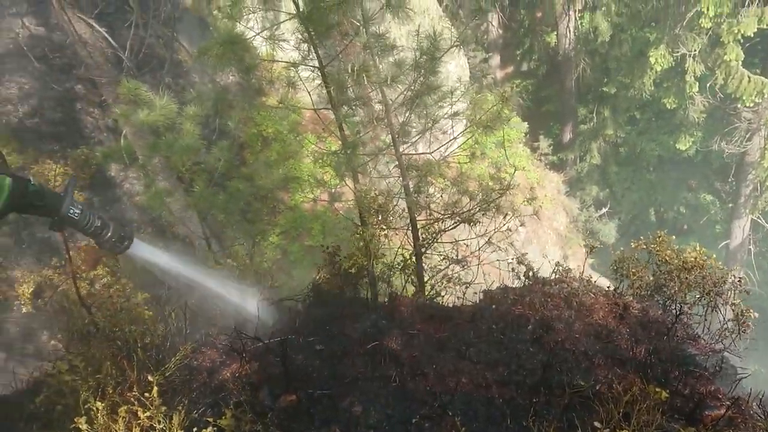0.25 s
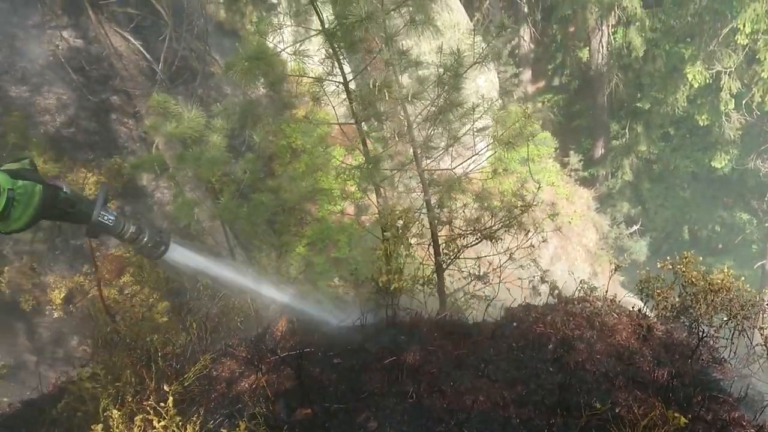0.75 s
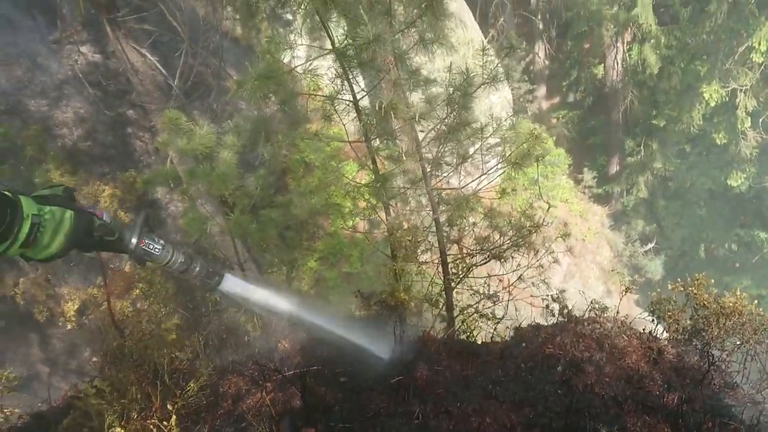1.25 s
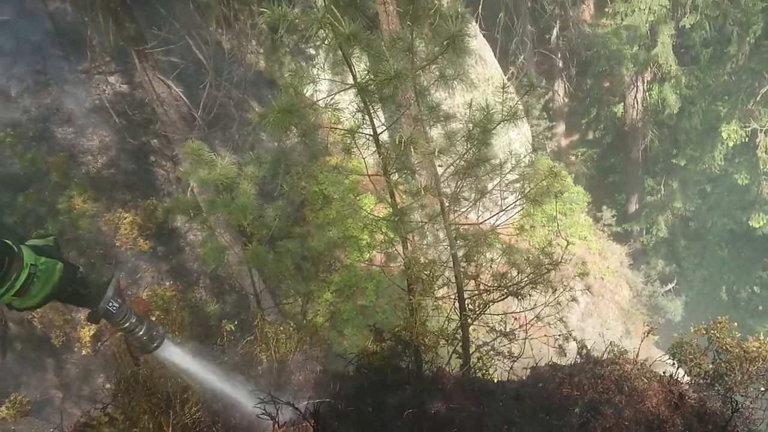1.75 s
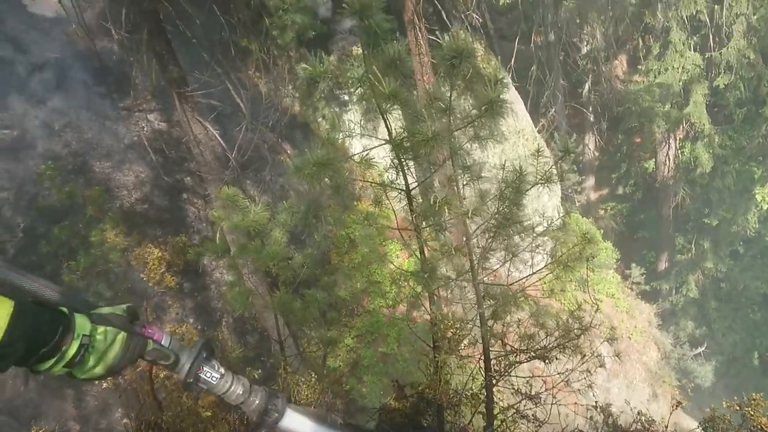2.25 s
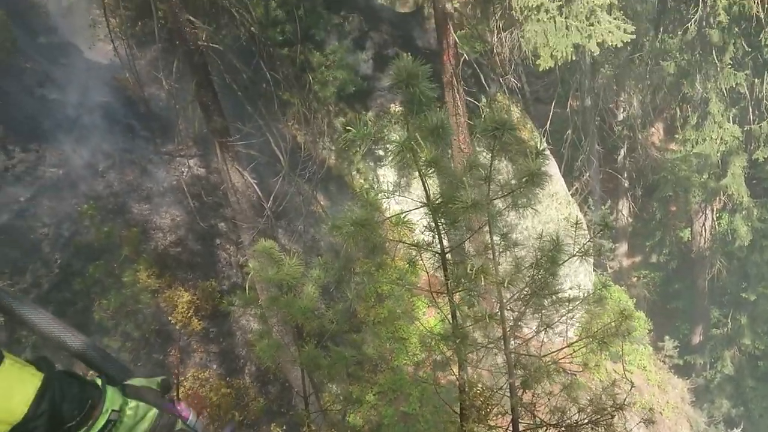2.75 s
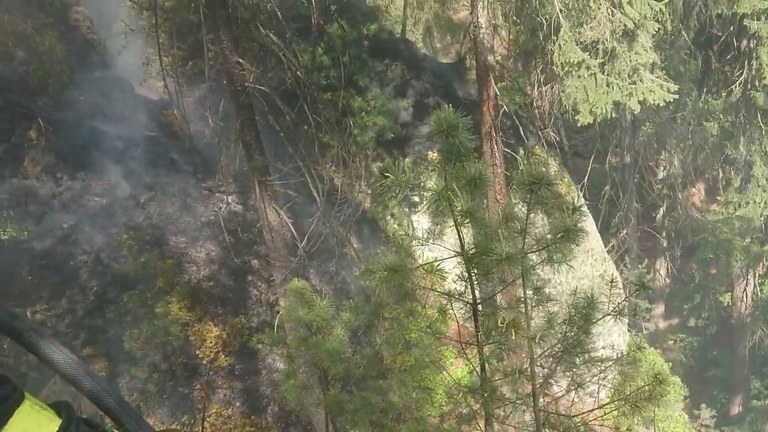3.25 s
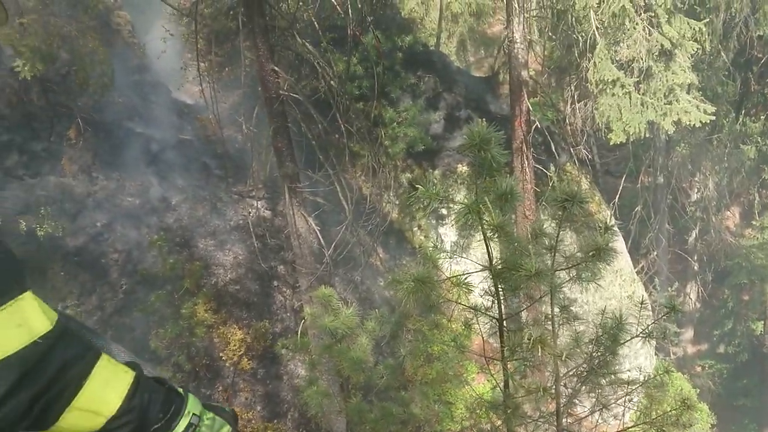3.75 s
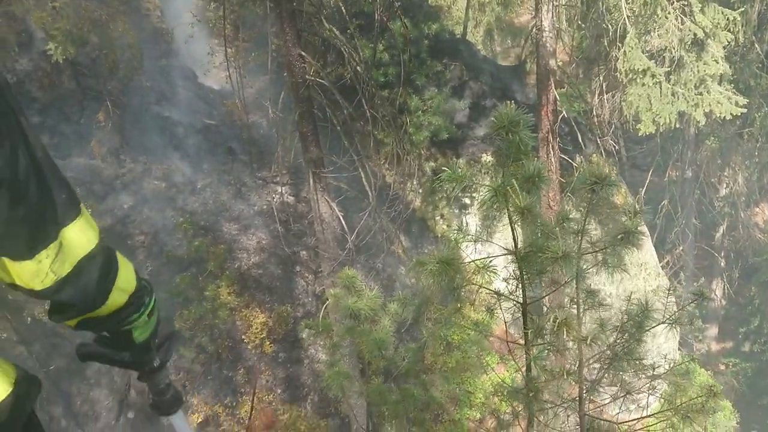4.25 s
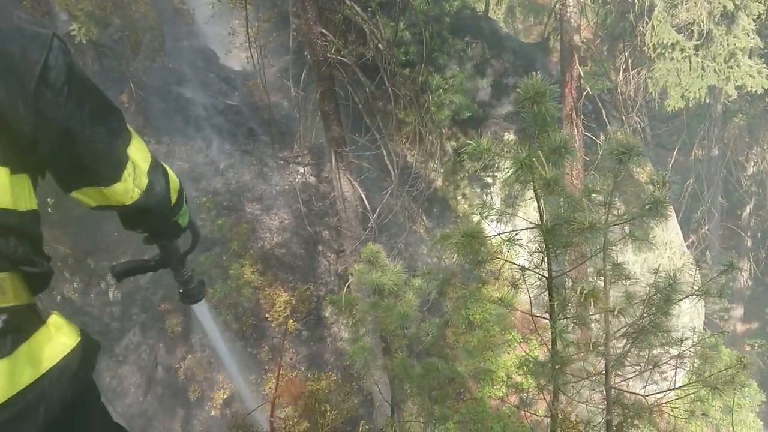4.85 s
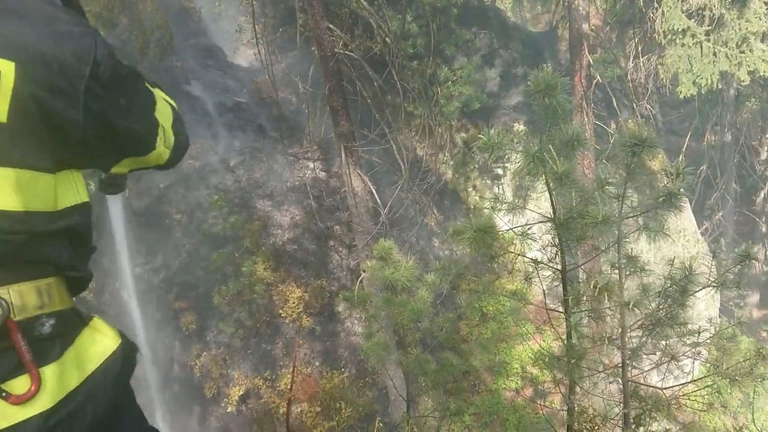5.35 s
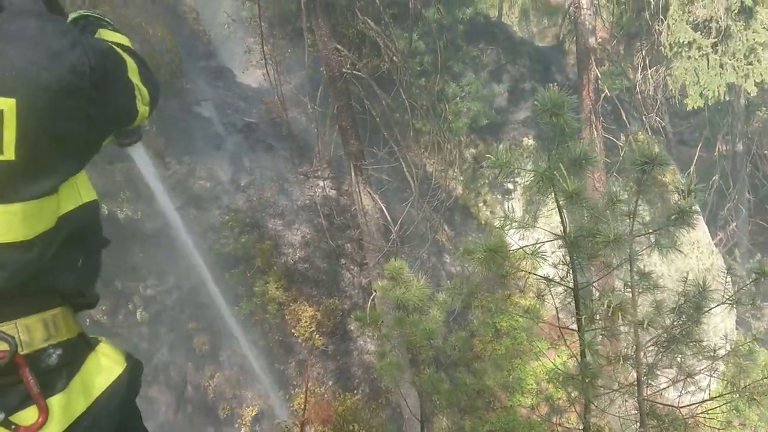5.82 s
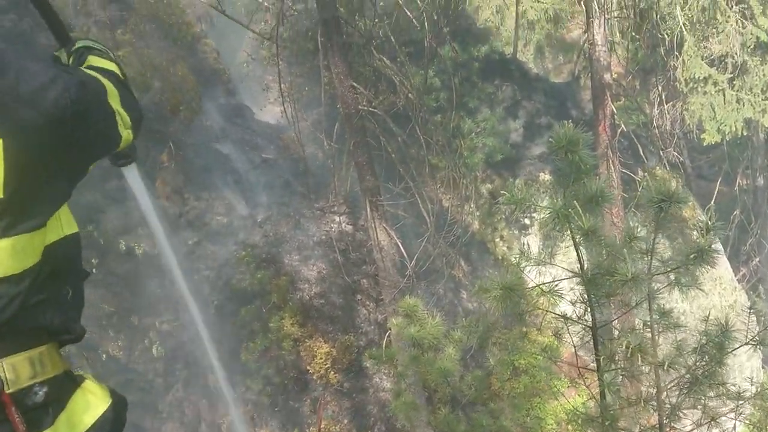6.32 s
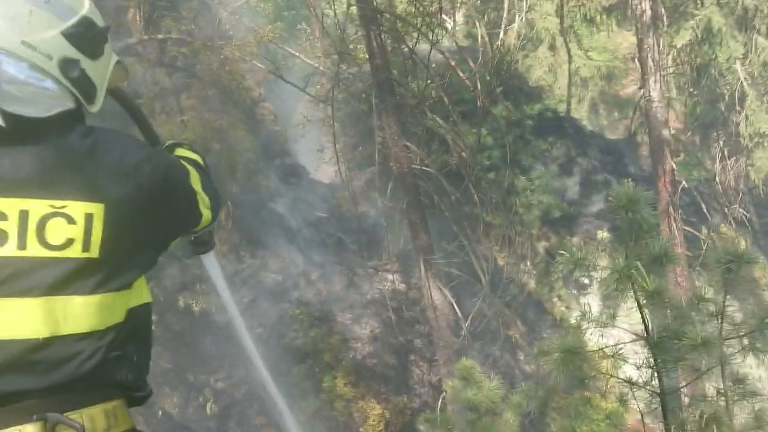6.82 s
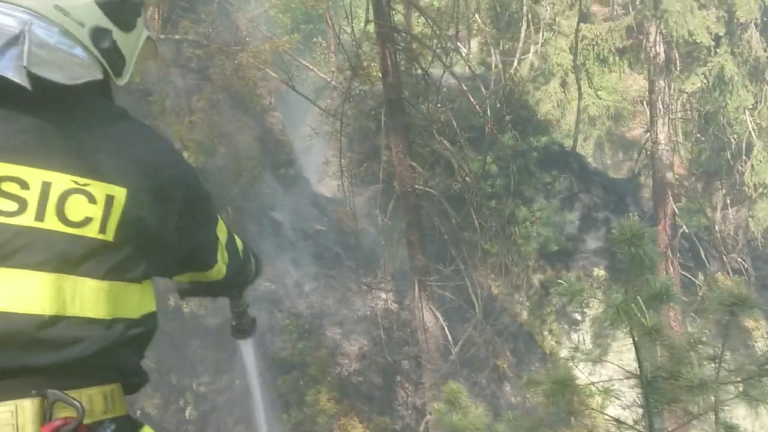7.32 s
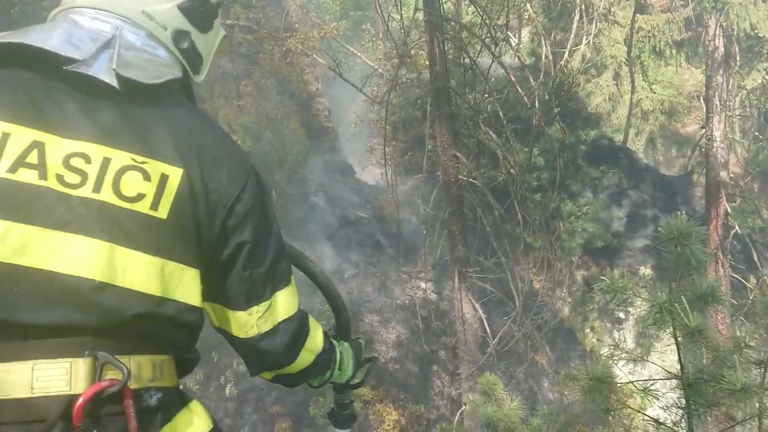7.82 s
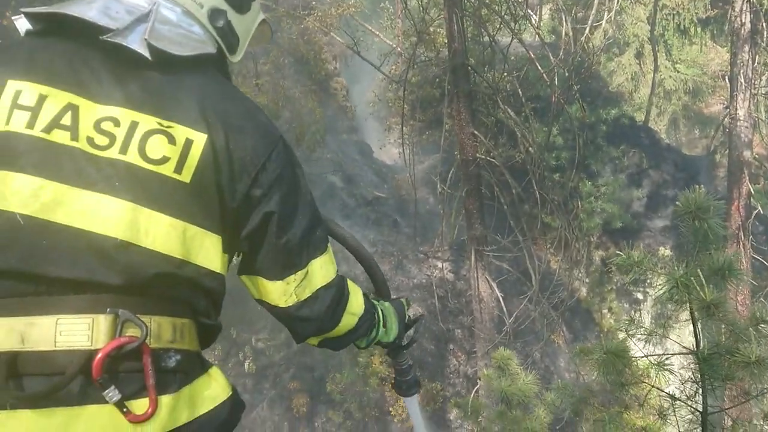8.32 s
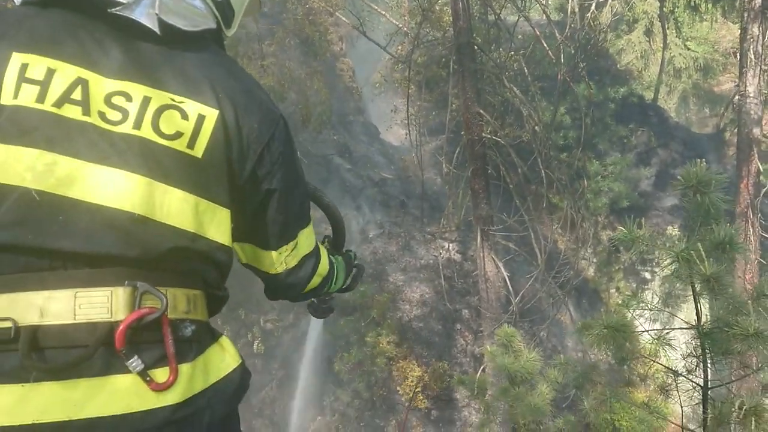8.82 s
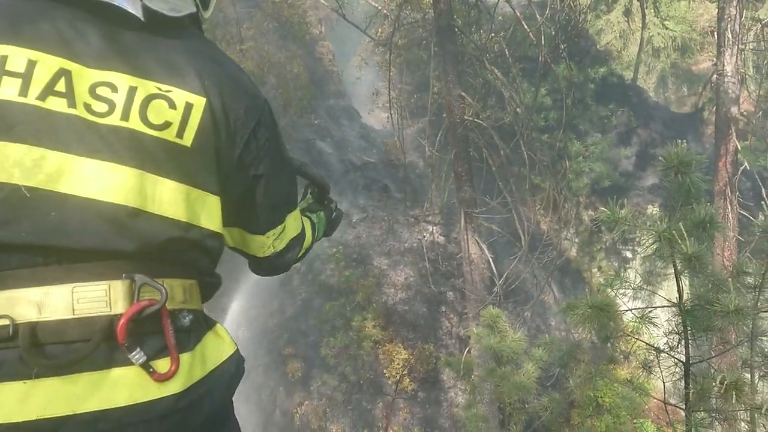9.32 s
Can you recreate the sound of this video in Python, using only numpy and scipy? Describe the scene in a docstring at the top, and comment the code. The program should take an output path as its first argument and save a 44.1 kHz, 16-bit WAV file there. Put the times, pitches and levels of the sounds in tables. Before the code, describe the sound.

A lumpy, bright water jet spatters over ground and brush, pulsing with each sweep of the arm, heard in wide stereo from near the person holding the hose. The nozzle then swings away and the splash drops to a thinner, more distant wash with slight body reflections. A single short knock sounds midway, twigs hiss sharply later, and a distant engine pump hums low throughout.

```python
"""A fire hose drums, splashes and hisses on soil and scrub, swept from side to side, then turned away downslope.
The jet is lumpy noise split into drumming, splash and spray, each following its own level curve.
Delay, phase and colour move the spot it hits across two microphone ports; an echo and twig bursts vary it.
A distant pump drones as wandering sine tones over filtered noise, and one knock rings as damped modes."""
import sys
import numpy as np
from scipy import signal
from scipy.fft import rfft, irfft, next_fast_len
from scipy.io import wavfile
from scipy.ndimage import uniform_filter1d, map_coordinates

SR = 44100
rng = np.random.default_rng(int(sys.argv[2]) if len(sys.argv) > 2 else 0)


def persist_wave(psi):
    """Save psi, clipped to +-1, as 16-bit WAV."""
    counts = np.round(np.clip(psi, -1, 1) * 32767).astype(np.int16)
    wavfile.write(sys.argv[1], SR, np.atleast_2d(counts).T)


N = 422037
TOP_HZ = 15750  # band limit


def amp(db):
    """Decibels to linear gain."""
    return 10 ** (np.asarray(db) / 20)


def unit(x):
    """Scale to an rms of one."""
    return x / np.sqrt(np.mean(np.abs(x) ** 2) + 1e-20)


def along(points, hz):
    """Read (Hz, value) points on a log frequency axis."""
    f, v = np.transpose(points)
    return np.interp(np.log(hz + 1), np.log(f + 1), v)


def curves(rows, t):
    """Each column after the time, read at times t."""
    s, *cols = np.transpose(rows)
    return [np.interp(t, s, c) for c in cols]


def wobble(rate, t):
    """A smooth random curve at times t, rate knots a second."""
    return map_coordinates(rng.standard_normal(int(t[-1] * rate) + 4), [t * rate])


def filtered(x, response):
    """Multiply the spectrum of x by a response of frequency."""
    m = next_fast_len(N + SR // 4)
    return irfft(rfft(x, m) * response(np.fft.rfftfreq(m, 1 / SR)), m)[..., :N]


def pump():
    """Engine tones that wander a little in pitch and strength, over a low rumble."""
    # Drone tones. Each row: frequency in Hz, relative level in dB, pitch wander in Hz.
    drone_tones = [(42.4, -65, 1), (51.8, -66, 1), (86.1, -53, 0.77), (93, -56.5, .8)]
    # Harmonics of the engine shaft. Each row: multiple of its rate, relative level in dB.
    shaft_harmonics = [(6, -59), (7, -64), (8, -49.5), (9, -62), (10, -67)]
    # Colour of the rumble. Each row: frequency in Hz, relative gain in dB.
    rumble_colour = [(20, -42), (34, -8.5), (81, 3), (103, 0), (141, -4.5), (172, -5.5), (222, -0.5),
                     (291, -3.5), (400, -5), (520, -46), (880, -120)]
    shaft_hz, shaft_wander_hz = 28.02, .04
    t = np.arange(N) / SR
    tones = 0
    for hz, db, wander in drone_tones:
        strength = amp(db + 1 + 0.76 * wobble(2.4, t))
        tones = tones + strength * np.sin(2 * np.pi * np.cumsum(hz + wander * wobble(4, t)) / SR)
    shaft = 2 * np.pi * np.cumsum(shaft_hz + shaft_wander_hz * wobble(3, t)) / SR
    for multiple, db in shaft_harmonics:
        tones = tones + amp(db + 1 + 1.4 * wobble(3, t)) * np.sin(multiple * shaft)
    noise = rng.standard_normal((3, N))
    shared, left, right = unit(filtered(noise, lambda hz: amp(along(rumble_colour, hz))))
    rumble = shared + .4 * np.array([left, right])
    return (tones + amp(-51.5) * rumble) * amp([[-2.1], [1.9]])  # stronger at the right port


def knock():
    """A dull blow on something hollow: a sharp push, then a ring that builds and is soon damped."""
    # The blow. Each row: start in seconds, relative level in dB.
    blows = [(5.4922, -15)]
    # Ringing modes. Each row: frequency in Hz, relative level in dB, time to decay by 60 dB in seconds.
    modes = [(366, -5, 0.052), (713, 1.5, 0.04), (1100, -1, 0.033), (1290, -1.5, 0.037), (1650, -4, .025),
             (2050, 0, .03), (3160, -14, .02)]
    out, t = np.zeros(N + SR), np.arange(SR // 10) / SR
    for s, db in blows:
        ring = sum(amp(level - 60 * t / t60) * np.sin(2 * np.pi * hz * t) for hz, level, t60 in modes)
        push = np.cos(2 * np.pi * 1150 * (t - .0006)) * np.exp(-((t - .0008) / .0006) ** 2)
        burst = np.pad(amp(-60 * t / .02) * rng.standard_normal(len(t)), (0, N - len(t)))
        snap = filtered(burst, lambda hz: along([(800, 0), (1500, 1), (2500, 1), (4000, 0)], hz))
        build = 1 - np.exp(-t / .003)
        blow = (ring + amp(6) * snap[:len(t)]) * build + amp(4) * push
        out[round(s * SR):][:len(t)] -= amp(db - 4.5) * blow
    return filtered(out[:N], lambda hz: along([(200, 0), (330, 1)], hz)) * amp([[-3.5], [2.5]])


def droplets(lumpy_db, slug_share, slug_db):
    """White spatter: noise in lumps of a few ms, with single heavier slugs of water."""
    t = np.arange(N) / SR
    stream = amp(lumpy_db * wobble(350, t)) * rng.standard_normal(N)
    slugs = (rng.random(N) < .01) * amp(slug_db * rng.exponential(size=N)) * rng.standard_normal(N)
    return unit(unit(stream) + slug_share * unit(slugs))


def sweep(t):
    """Lag of the left port in microseconds: the arm speeds up and slows down between its turns."""
    # The arm reverses. Each row: time in seconds, lag of the left port in microseconds.
    reversals = [(-.1, -95), (.27, -175), (.67, -78), (1.07, -185), (1.51, -56), (1.93, -184), (2.3, -45),
                 (2.69, -154), (3.09, -37), (3.53, -161), (3.85, -39), (4.6, -248), (5.0, -232),
                 (5.43, -302), (5.85, -282), (6.27, -319), (6.92, -255), (7.13, -283), (8.29, -83),
                 (9.03, -218), (9.4, -204), (9.7, -228)]
    s, lag = np.transpose(reversals)
    turn = np.interp(t, s, np.arange(len(s)))
    eased = np.floor(turn) + (1 - np.cos(np.pi * (turn % 1))) / 2
    return np.interp(eased, np.arange(len(s)), lag)


def stance_shares(t):
    """Crossfade weights of the seven places where the jet lands."""
    # Where it lands: 0 = ahead, 1 = below and right, 2 = below the ports, 3-4 = down the slope,
    # 5 = swung back, 6 = down again. Each row: time in seconds, place.
    places = [(0, 0), (2.4, 0), (2.62, 1), (2.78, 1), (3.0, 2), (3.22, 2), (3.47, 1), (3.6, 1), (3.78, 2),
              (4.1, 2), (4.3, 3), (5.4, 3), (5.7, 4), (7.25, 4), (7.95, 5), (8.55, 5), (8.85, 6), (9.57, 6)]
    stance, = curves(places, t)
    return [np.clip(1 - abs(stance - k), 0, 1) for k in range(7)]


def blend(tables, shares, f):
    """Mix frequency curves by the share of each place."""
    return sum(along(table, f) * share for table, share in zip(tables, shares))


def echo_and_streaks(t, f):
    """Gain at each port: the comb of one moving echo, and slow random streaks."""
    # A copy bounced off the person holding the hose. Each row: time in seconds, left and right delays in ms,
    # left and right strengths (0-1).
    echo_path = [(4.1, 1.15, .95, 0, 0), (4.4, 1.02, 1.0, .45, .2), (5.2, 1.05, 1.13, .45, .3),
                 (5.55, 1.05, 1.45, .25, .3), (6.0, 1.14, 1.55, .3, .55), (6.3, 1.15, 1.55, .45, .5),
                 (6.8, 1.27, 1.57, .45, .55), (7.1, 1.2, 1.53, .35, .5), (7.45, 1.2, 1.44, .45, .3),
                 (7.8, 1.14, 1.25, .5, .4), (8.2, 1.12, 1.3, .55, .3), (8.55, 1.09, 1.18, .5, .35),
                 (8.85, .98, 1.17, .4, .45), (9.2, 1.02, 1.24, .2, .45), (9.57, 1.05, 1.3, .2, .3)]
    # Each row: frequency in Hz, share of the copy.
    echo_reach = [(700, 0), (1200, 1), (3000, 1), (4500, .2)]
    *delay_ms, left, right = curves(echo_path, t)
    share = np.clip([left, right], 0, .9)[:, None] * along(echo_reach, f)
    phase = 2 * np.pi * f * np.array(delay_ms)[:, None] / 1000
    comb = np.sqrt((1 + share ** 2 + 2 * share * np.cos(phase)) / (1 + share ** 2))
    # slow random streaks: narrow bands swell and sink separately at each port
    streaks = uniform_filter1d(rng.standard_normal(comb.shape), size=2, axis=1)
    streaks = uniform_filter1d(streaks, size=90, axis=2)
    depth = along([(500, .4), (1200, 1), (3000, 1), (5500, .6), (12000, .5)], f)
    return comb * amp(1.8 * unit(streaks) * depth)


def port_colour(shares, t, f):
    """Each port's spectrum turns with the place where the jet lands, with an echo and random streaks."""
    # Colour at each port, one curve a place. Each row: frequency in Hz, relative gain in dB.
    left_colours = [
        [(258, -12.5), (520, -14.5), (690, -8.5), (1120, -11), (1290, -15), (1460, -8), (2410, -2.5),
         (2670, -4.5), (4570, 2.0), (5250, -6), (7920, -4.5), (10680, -3.5), (13180, 1.5), (15590, -5.5)],
        [(258, -12), (520, -15), (600, -10.5), (780, -6.5), (1380, -10), (2150, -0.5), (2760, 2.5), (3010, -5),
         (4570, 4.0), (5080, -4.5), (9130, -4.5), (11970, 0), (13010, 4), (15590, -4)],
        [(258, -9.5), (520, -11.5), (690, -6), (1120, -5.5), (2070, -7), (2760, 3.5), (3100, -2), (4570, 4.5),
         (5340, -8), (5940, -2.5), (7920, -5.5), (10340, -4.5), (13180, 2), (15590, -8)],
        [(258, -15), (520, -12), (860, -10), (1380, -8), (1800, -1), (2330, -3), (3100, -2), (3790, -3.5),
         (4650, 2), (5250, -7.5), (10080, -4), (13090, 2.5), (15590, -5)],
        [(258, -12), (520, -10.5), (1380, -5), (1640, -4), (2330, -5.5), (4740, 0), (5170, -8.5), (6030, -5.5),
         (6980, -7.5), (10080, -4), (13090, 2), (15590, -5)],
        [(258, -18), (520, -10), (780, -6), (1120, -9), (1380, -7), (1800, -1), (2330, -1), (4650, 0),
         (5080, -7), (9910, -5), (13180, 1.5), (15590, -4)],
        [(258, -4), (520, -8.5), (1210, -8), (1380, -7), (1720, 0), (2410, -4), (4740, 0.5), (5250, -12),
         (5940, -4), (7840, -7.0), (11970, -2), (13010, 1.5), (15590, -6.5)],
    ]
    right_colours = [
        [(258, -6.5), (520, -9), (600, -4.5), (1210, -1.5), (1980, 10.5), (3190, 1.5), (4310, 1), (5680, -5.5),
         (7060, 1.5), (8350, 1.0), (9990, -5.5), (13180, 2.5), (14640, 1.5), (15590, -4)],
        [(258, -6.5), (520, -8.5), (600, -4), (1290, 2), (1640, 9.5), (2150, 10.5), (2410, 8), (3700, -2),
         (4220, 0), (5080, -4), (7920, -1.5), (9560, -5.5), (14900, 1), (15590, 0)],
        [(258, -5.5), (520, -6.5), (600, -1.5), (780, -1.5), (1210, 2.0), (1980, 10), (3450, 0.5), (5680, 5),
         (6120, 0.5), (6720, 2), (9130, -8), (10940, 1.0), (13610, -6.5), (15590, -3)],
        [(258, -7), (520, -8), (600, -3.5), (1120, 0.5), (1550, 10.5), (1890, 13), (4570, -7.5), (5250, -7.5),
         (6370, 1.5), (8270, -1.0), (9730, -7), (12830, -1.5), (15070, -2), (15590, -6.0)],
        [(258, -2), (520, -5), (1030, 5.5), (1290, 8.5), (1980, 11.5), (2600, 5.5), (4130, -9), (5510, -4.5),
         (6200, 3), (7750, -4), (9910, -6.0), (10850, -2.0), (14560, -2.5), (15590, -6.0)],
        [(258, -7), (520, -3), (1210, 4.5), (1550, 8.5), (2410, 8.5), (3270, 3.5), (4310, -6), (6980, -1),
         (8100, -5.5), (9820, -6.5), (12830, 2), (15590, -3)],
        [(258, 2), (520, -3), (950, 1.5), (1720, 11.5), (2410, 5.5), (3360, 1.5), (3620, -4.5), (6720, -1),
         (8350, -7.5), (10340, -2.5), (14300, -2), (15250, 2), (15590, -0.5)],
    ]
    colour = amp([blend(left_colours, shares, f), blend(right_colours, shares, f)])
    return colour * echo_and_streaks(t, f) * (f > 140) * (f < TOP_HZ)


def jet_levels(t, lag):
    """Splash, drumming and spray in dB: motion raises them, gaps cut them, twigs throw up spray."""
    # The jet with the nozzle held still. Each row: time in seconds, then relative levels of splash,
    # drumming and spray in dB.
    still_levels = [(0, -26.5, -41, -22.5), (.2, -23.5, -35, -20), (.3, -15, -34, -23.5),
                    (.43, -28.5, -42, -23.5), (.75, -24.5, -41.5, -21.5), (.88, -28.5, -40.5, -26.5),
                    (1.0, -27, -43, -21.5), (1.1, -26, -40.5, -25), (1.22, -24.5, -37.5, -21),
                    (1.4, -21.5, -42, -21.5), (1.68, -23, -37.5, -21), (1.84, -25.5, -40.5, -22.5),
                    (2.0, -23.5, -41, -23), (2.13, -22.5, -39, -20), (2.24, -24, -39.5, -23),
                    (2.38, -22.5, -38, -21), (2.5, -26.5, -38, -21.5), (2.74, -22.5, -38, -25),
                    (2.84, -30, -47.5, -22.5), (3.0, -22, -37.5, -23.5), (3.17, -22.5, -36.5, -20),
                    (3.28, -25, -38.5, -22), (3.4, -27, -39, -23), (3.54, -17, -38, -22.5),
                    (3.65, -29, -36.5, -27), (3.72, -22, -38, -23), (3.78, -23.5, -37, -22),
                    (3.86, -20.5, -33.5, -22.5), (4.03, -30.5, -42.5, -25.5), (4.13, -27.5, -40.5, -26.5),
                    (4.43, -32.5, -49, -24.5), (4.6, -31, -51.5, -36.5), (5.3, -35, -48, -38),
                    (6.2, -34, -48.5, -38), (7.4, -34.5, -49, -36.5), (7.9, -34, -48, -34.5),
                    (8.3, -32.5, -47.5, -36), (8.85, -36, -50, -37.5), (9.57, -32.5, -48, -36)]
    # A moving jet is louder: splash, drumming, spray, in dB per microsecond of lag a second.
    swing_db = [0.008, 0.0023, 0.0044]
    # The stream falters. Each row: time in seconds, depth in dB, half width in seconds.
    falters = [(.56, 3.5, 0.016), (.77, 2.5, 0.024), (1.08, 1, 0.022), (4.29, 4.5, 0.014), (4.5, 2, 0.031),
               (1.31, 3.5, 0.033), (3.63, 0.5, 0.043)]
    # The jet clips twigs. Each row: time in seconds, spray rise in dB, swell and fade times in seconds.
    twig_bursts = [(8.062, 13, .005, 0.055), (8.17, 10.5, 0.011, 0.033), (8.45, 15.5, 0.036, 0.048),
                   (8.492, 7, .004, 0.013), (8.52, 15, 0.0058, 0.013), (5.6, 8, 0.0044, 0.009),
                   (13, 2, .01, .02), (2.76, 6, 0.016, 0.018), (4.54, 4.5, .01, .02),
                   (4.17, 3.5, .015, 0.011), (2.7, 0.5, 0.043, 0.03)]
    gaps_db = sum(db * np.exp(-((t - s) / width) ** 2) for s, db, width in falters)
    swing = np.outer(swing_db, abs(np.gradient(lag, t)))
    splash_db, drum_db, spray_db = curves(still_levels, t) + swing - gaps_db
    burst_db = sum(db * np.exp(-np.where(t < s, (s - t) / swell, (t - s) / fade))
                   for s, db, swell, fade in twig_bursts)
    return splash_db + 0.23 * burst_db, drum_db, spray_db + burst_db


def jet_gain(colour, lag, far, t, hz):
    """The stream breaks up unevenly: each part flutters, and patches drift through the noise."""
    f = hz[:, None]

    def level(lo, hi):
        """Strength of the coloured noise between two frequencies."""
        power = abs(colour[:, (hz > lo) & (hz < hi)]) ** 2
        return np.sqrt(np.sum(power, axis=(0, 1)) / len(hz) / 2)

    splash_db, drum_db, spray_db = jet_levels(t, lag)
    drumming, splash, hiss = level(280, 900), level(900, 3500), level(5500, 15500)
    # share of each band given to drumming and spray; splash takes the rest
    drum, spray = along([(600, 0.89), (1100, 0.043)], f), along([(2800, 0.027), (5500, 0.8)], f)
    fizz = along([(5000, -0.62), (14000, 0.91)], f)  # fine and coarse droplets trade places
    patches = uniform_filter1d(rng.standard_normal((len(hz), len(t))), size=3, axis=0)
    patches = uniform_filter1d(patches, size=24, axis=1)
    uneven = 1 - (1 - 0.35) * far  # 0.35 of the unevenness is left when the jet lands far away
    drum_db = drum_db - 0.75 + 0.29 * wobble(17, t)
    spray_db = spray_db - 0.45 + 0.96 * wobble(23, t) + 1.24 * fizz * wobble(16, t)
    splash_db = splash_db - 1.77 + 0.86 * wobble(9, t) * uneven
    gain = (amp(drum_db) / drumming) ** drum * (amp(spray_db) / hiss) ** spray
    gain = gain * (amp(splash_db) / splash) ** (1 - drum - spray)
    return gain * amp(0.59 + 0.31 * wobble(25, t) + 1.16 * unit(patches) * uneven)


def jet():
    """One spatter reaches both ports, lagging by direction; scattered spatter differs from port to port."""
    # Sound bending round the body between the ports: landing ahead, below, down the slope twice, swung back.
    # Each row: frequency in Hz, phase by which the left leads in radians.
    body_phase = [
        [(260, -0.5), (600, -0.6), (1120, -1.2), (2150, -0.6), (2580, -1.3), (3270, -1.0), (4910, -2.9),
         (5600, -2.2), (6120, -0.3), (7840, 0.4), (10160, 0.4), (11540, 1.5), (15590, -0.3)],
        [(260, -0.4), (690, -0.7), (1290, -1.8), (1980, -1.1), (2500, -1.2), (3620, -2.9), (5000, -5.6),
         (5680, -4.9), (8010, -6.7), (8700, -9.9), (11540, -11.2), (14640, -13.7), (15590, -12.5)],
        [(260, -0.9), (1210, -1.5), (1550, -0.6), (2330, -1.4), (2500, -0.5), (3700, -2.1), (3960, -1.4),
         (4910, -1.6), (5430, -0.1), (9650, -0.9), (10160, 1.3), (12750, 0.1), (15590, -2.9)],
        [(260, -0.9), (950, -1.4), (1640, -1.0), (1890, -2.2), (2330, -0.7), (2760, -1.0), (3360, -2.3),
         (5600, -0.5), (5860, -1.1), (7240, -0.6), (10160, -4.8), (12140, -6.0), (15590, -5.4)],
        [(260, -0.7), (950, -1.2), (1290, -1.6), (1460, -0.5), (1810, -0.4), (2150, -1.9), (2500, -1.5),
         (4130, -1.4), (4390, -0.2), (8440, -0.3), (8700, 2.3), (14380, 0.3), (15590, 1.5)],
    ]
    # Left-right likeness: landing ahead, below, turning away, far. Each row: frequency in Hz, likeness (0-1).
    likeness = [
        [(300, .98), (1200, .87), (2500, .64), (3100, .55), (4500, .74), (5500, .92), (6500, .55), (8000, .55),
         (9500, .7), (12500, .6), (15500, .4)],
        [(300, .98), (1200, .87), (2500, .68), (4200, .85), (5500, .6), (8500, .45), (12000, .55), (15500, .25)],
        [(300, .96), (700, .74), (1200, .76), (1800, .9), (2300, .55), (2900, .7), (3300, .9), (3650, .96),
         (4200, .42), (5300, .45), (8500, .3), (12000, .35), (15500, .2)],
        [(300, .96), (700, .78), (1200, .84), (1800, .76), (2300, .62), (3500, .62), (4200, .3), (5300, .42),
         (8500, .3), (12000, .4), (15500, .25)],
    ]
    frame = 512  # samples
    spatter = [droplets(lumpy_db=1.25, slug_share=0.19, slug_db=2.0) for _ in range(3)]
    hz, t, (direct, *scattered) = signal.stft(spatter, SR, nperseg=frame, noverlap=frame * 3 // 4)
    f, lag, shares = hz[:, None], sweep(t), stance_shares(t)
    ahead, below, far = shares[0], sum(shares[1:3]), sum(shares[3:])
    colour = port_colour(shares, t, f)
    gain = jet_gain(colour, lag, far, t, hz)
    phase_shares = [ahead, below, *shares[3:5], sum(shares[5:])]
    turn = sum(np.exp(1j * along(table, f)) * share for table, share in zip(body_phase, phase_shares))
    lead = turn / abs(turn) * np.exp(-2j * np.pi * f * lag * 1e-6)
    alike = np.clip(blend(likeness, [ahead, below, shares[3], sum(shares[4:])], f), 0, 1)
    ports = np.sqrt(alike) * np.array([direct * lead, direct]) + np.sqrt(1 - alike) * np.array(scattered)
    return signal.istft(ports * colour * gain, SR, nperseg=frame, noverlap=frame * 3 // 4)[1][:, :N]


def scene():
    """The pump and the knock behind the jet."""
    return pump() + knock() + jet()


def record(dry):
    """The loudest peaks round off, and nothing above the band limit is kept."""
    rounded = dry / (1 + abs(dry / .88) ** 6) ** (1 / 6)
    return filtered(rounded, lambda hz: hz < TOP_HZ)


dry = scene()
out = record(dry)
persist_wave(out)
```